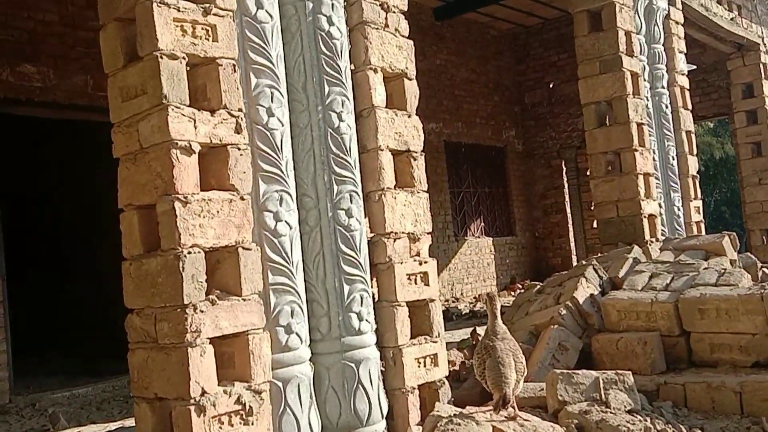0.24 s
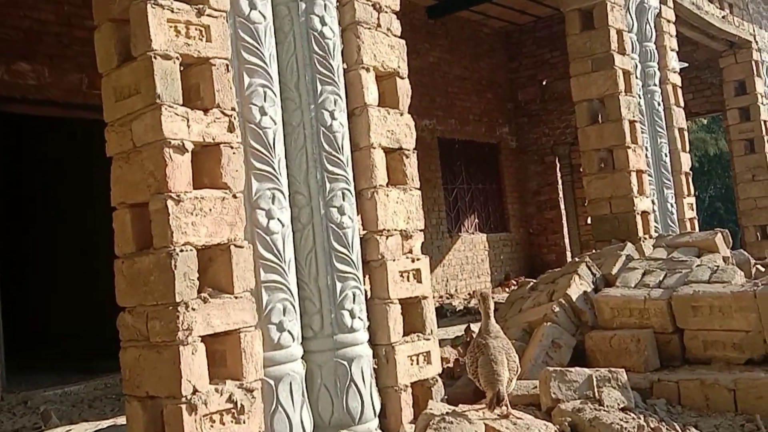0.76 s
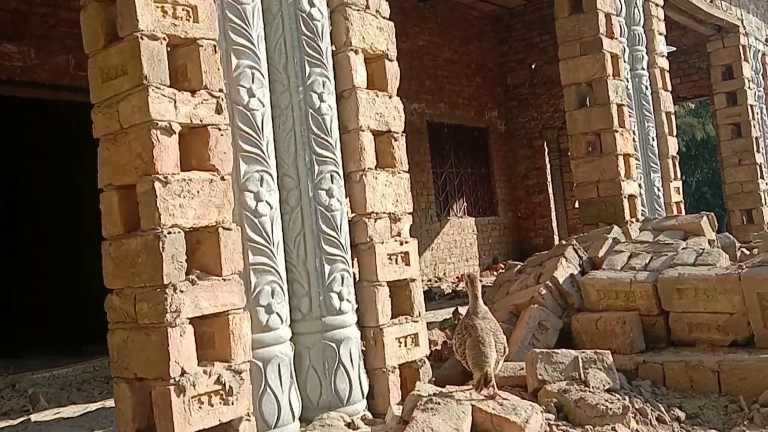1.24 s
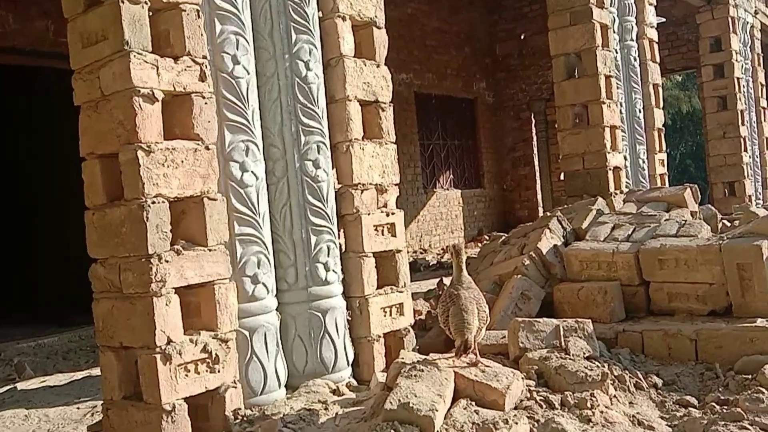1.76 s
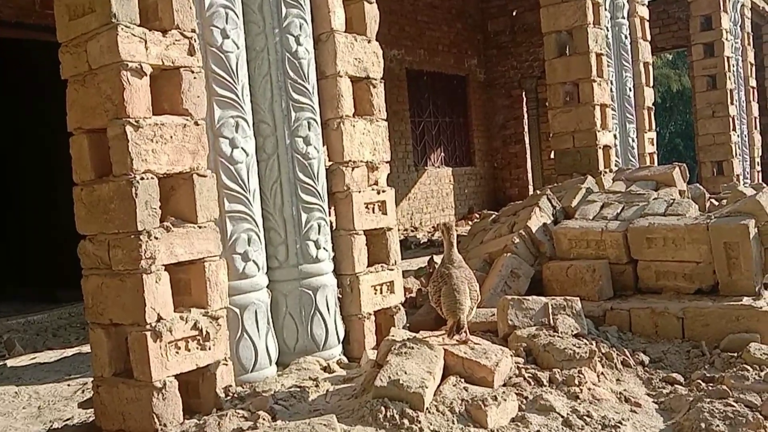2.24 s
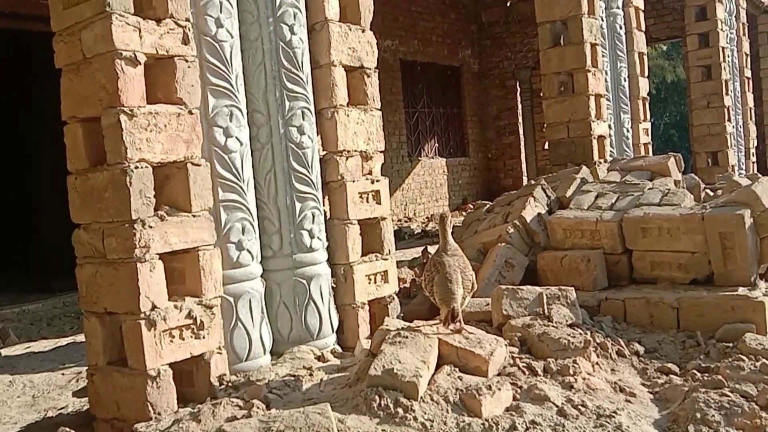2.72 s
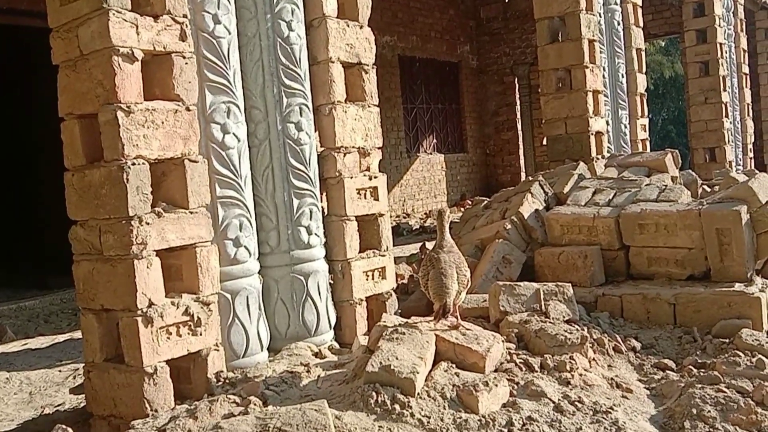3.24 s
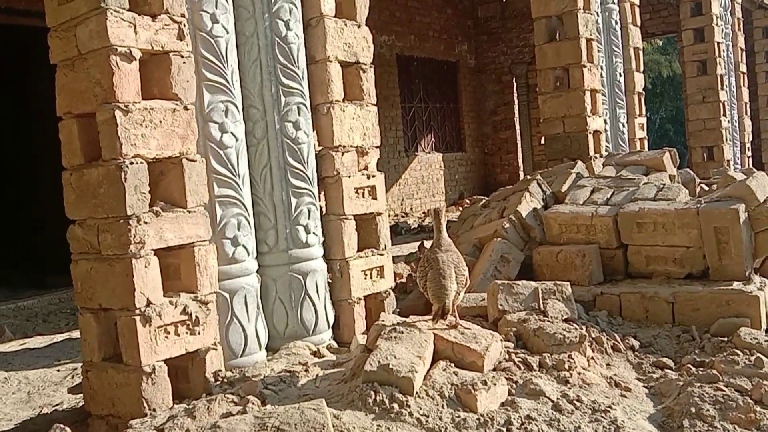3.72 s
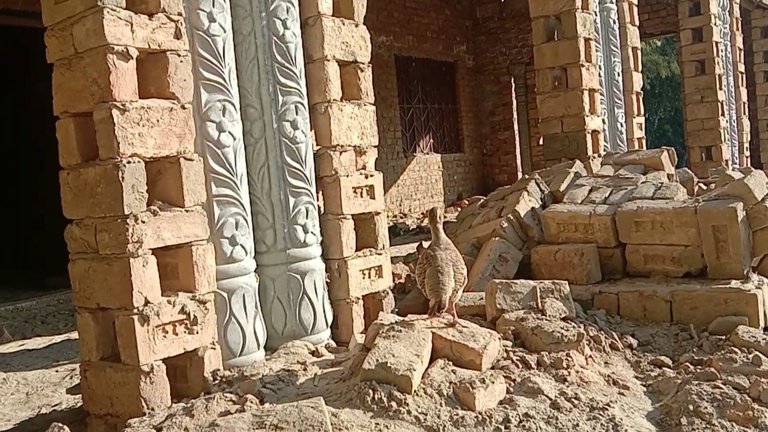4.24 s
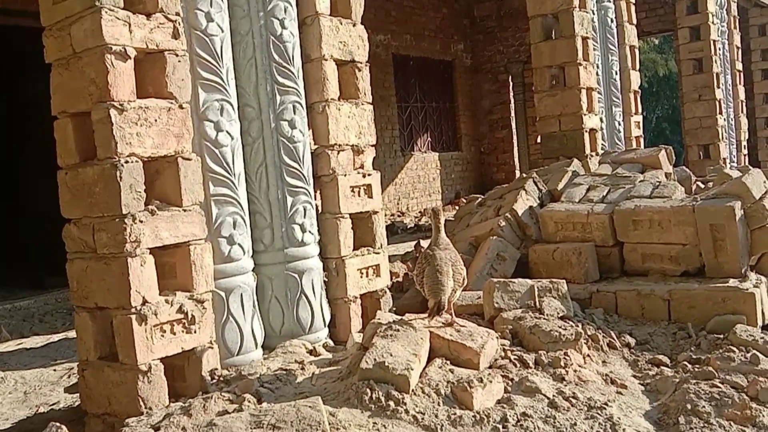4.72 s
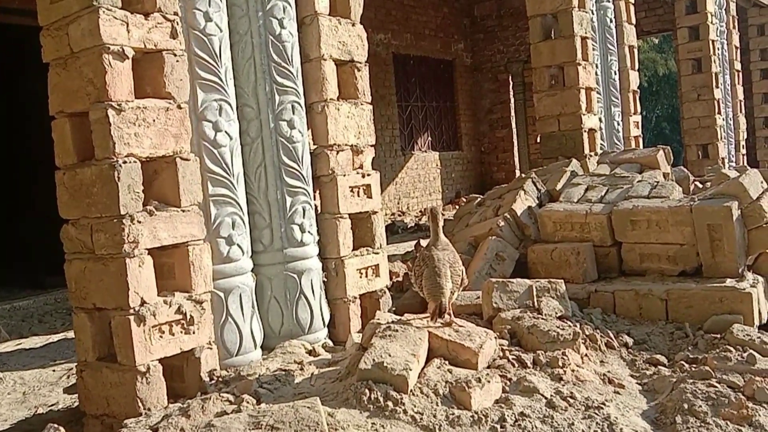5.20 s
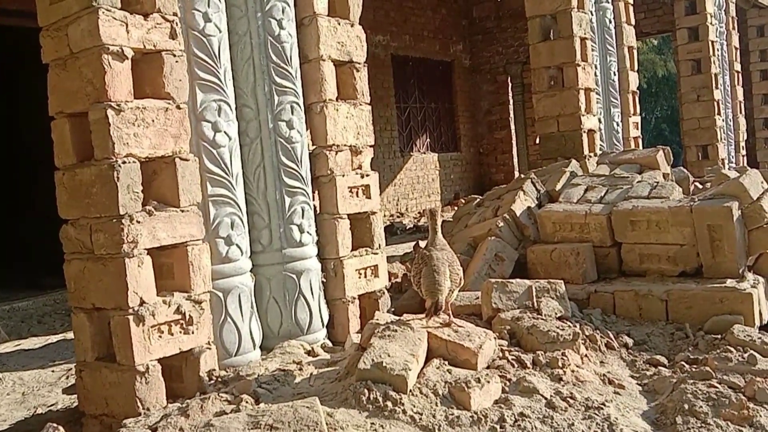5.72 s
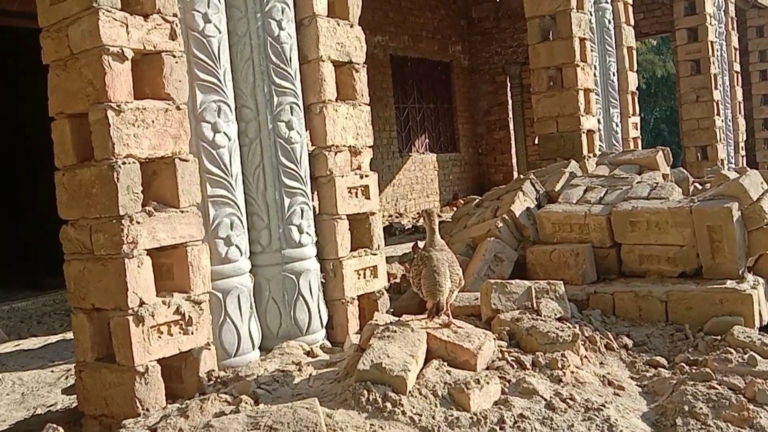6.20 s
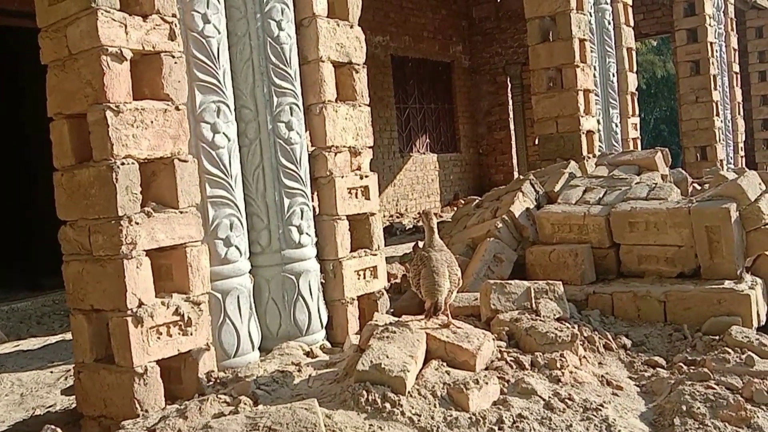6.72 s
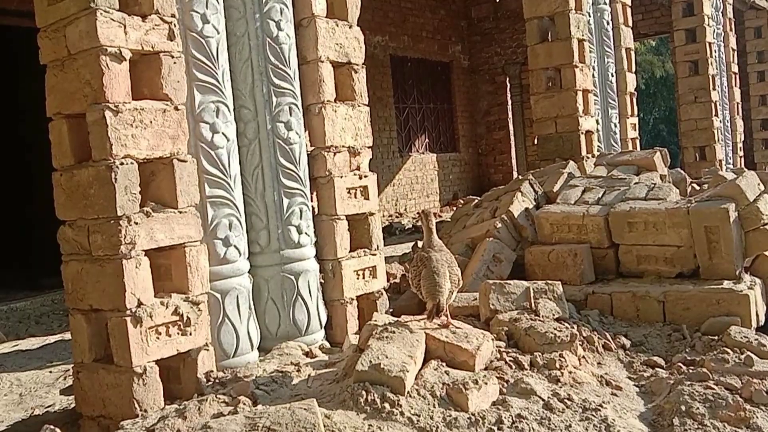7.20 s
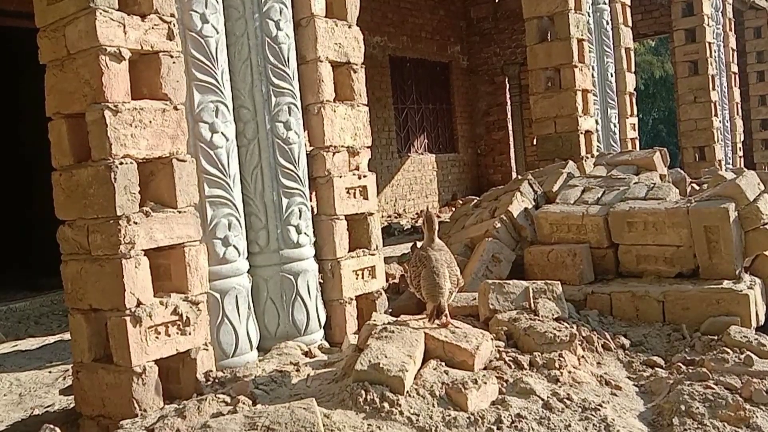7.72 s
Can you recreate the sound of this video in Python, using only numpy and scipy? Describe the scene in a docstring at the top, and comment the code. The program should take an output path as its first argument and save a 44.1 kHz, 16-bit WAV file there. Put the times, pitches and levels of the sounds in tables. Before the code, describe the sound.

Two francolins call in a tight, repeating duet outdoors among brick pillars and rubble. The nearer bird gives a soft throaty gulp, then a loud, nearly pure whistle with a brief arched pitch. Its mate adds hoarse clucks in twos and threes and a raspy screech just after. Brickwork returns short echoes; a low rumble and faint hum sit underneath.

```python
"""Francolin duet in a brick yard

The near bird gulps (two thumps, hoarse noise) and whistles an arched, nearly pure tone.
Its mate screeches (pulsed rasps, clear note, rasps, falling slur) and gives hoarse, ringing clucks.
Veranda brickwork echoes the mate and the yard scatters the whistle, over a rumble and faint hum.
"""
import sys
import numpy as np
from scipy import signal
from scipy.fft import rfft, irfft
from scipy.io import wavfile
from scipy.ndimage import uniform_filter1d, minimum_filter1d

SR = 44100
rng = np.random.default_rng(int(sys.argv[2]) if len(sys.argv) > 2 else 0)


def dump_mix(stems):
    """Bounce the given channels to the path in sys.argv[1] as a 16-bit WAV at rate SR."""
    frames = np.atleast_2d(stems).T  # one column per channel
    limited = np.clip(frames, -1, 1)  # hard clip at full scale
    pcm = np.round(limited * 32767).astype(np.int16)
    wavfile.write(sys.argv[1], SR, pcm)


N = 350595
TIME = np.arange(N) / SR

# Reflection spectrum of the brickwork. Each row: frequency in Hz, gain in dB.
WALL_SPECTRUM = [(200, -12.5), (800, -5), (1400, -9), (2000, 3.5), (2600, -12), (3500, -10), (4500, -12.5),
                 (5300, -13), (6100, 0), (7000, -9.5), (9000, -23), (14000, -32)]


def undb(db):
    """Decibels to amplitude gain."""
    return 10 ** (np.asarray(db) / 20)


def unit(x):
    """Scale to rms 1."""
    return x / np.sqrt(np.mean(x ** 2))


def add(out, start_s, x):
    """Mix x into out from start_s, cropped to fit."""
    i = int(round(start_s * SR))
    x, i = x[max(-i, 0):], max(i, 0)
    out[i:i + len(x)] += x[:max(len(out) - i, 0)]


def colour(x, points, size=2048):
    """Minimum-phase filter through (Hz, dB) points, made by folding the cepstrum."""
    point_hz, point_db = np.transpose(points)
    hz = np.maximum(np.arange(size // 2 + 1) * SR / size, 1)
    gain_db = np.interp(np.log(hz), np.log(point_hz), point_db)
    cepstrum = irfft(np.log(undb(gain_db)))
    cepstrum[1:size // 2] *= 2
    cepstrum[size // 2 + 1:] = 0
    response = irfft(np.exp(rfft(cepstrum)))
    return signal.fftconvolve(x, response)[:len(x)]


def wander(t, rate_hz):
    """Low-passed noise of rms 1 that changes about rate_hz times a second."""
    spectrum = rfft(rng.standard_normal(len(t)))
    hz = np.arange(len(spectrum)) * SR / len(t)
    return unit(irfft(spectrum / (1 + (hz / rate_hz) ** 4), len(t)))


def swell(t, rise_s, fall_s):
    """Gaussian-sided envelope that peaks at t = 0."""
    return np.exp(-(t / np.where(t < 0, rise_s, fall_s)) ** 2)


def burst(t, rise_s, fall_s):
    """A swell with a steeper, fourth-power start."""
    onset = np.exp(-(np.minimum(t, 0) / rise_s) ** 4)
    return swell(np.maximum(t, 0), 1, fall_s) * onset


def held(t, length_s, attack_s, release_s):
    """Envelope eased in from t = 0, held, and eased out by length_s."""
    ramp = np.minimum(t / attack_s, (length_s - t) / release_s)
    return np.sin(np.pi / 2 * np.clip(ramp, 0, 1)) ** 2


def tone(hz, overtones, lift_db=0):
    """Clean membrane vibration: fundamental of rms 1 plus (multiple, dB) overtones, lifted by lift_db."""
    phase = 2 * np.pi * np.cumsum(hz) / SR
    upper = sum(undb(db) * np.sin(round(k) * phase) for k, db in overtones)
    return np.sqrt(2) * (np.sin(phase) + undb(lift_db) * upper)


def pulses(hz, scatter, uneven_db, count=400):
    """Irregular membrane slaps: each cycle draws its own length and strength."""
    chance = rng.standard_normal((count, 2))
    out, at = np.zeros(len(hz) + 1), 0.
    for stretch, strength in chance:
        i = int(at)
        if i >= len(hz):
            break
        # split between two samples for a fractional position
        out[i:i + 2] += undb(uneven_db * strength) * np.array([1 - (at - i), at - i])
        at += SR / hz[i] * np.exp(scatter[i] * stretch)
    return unit(out[:-1])


def background():
    """Outdoor rumble as filtered noise, and a faint hum of wavering pitch and level."""
    # Rumble spectrum. Each row: frequency in Hz, relative level in dB.
    rumble_spectrum = [(20, -27), (45, -12.5), (70, 1.5), (130, -1), (170, 5.5), (220, -11), (330, -18),
                       (900, -25), (2000, -23), (4000, -37), (8000, -55), (14000, -52)]
    rumble_db = -63.5 + 1.9 * wander(TIME, 2.5)
    rumble = undb(rumble_db) * unit(colour(rng.standard_normal(N), rumble_spectrum))
    hum_hz = 178 * (1 + .02 * wander(TIME, 8.8))
    hum_db = -70 + 2.5 * wander(TIME, 8.1)
    return rumble + undb(hum_db) * tone(hum_hz, [(2, -28.0)])


def tail(t60_s):
    """Diffuse brickwork reflections: decaying coloured noise of unit energy."""
    t = np.arange(int(.9 * SR)) / SR
    build_up = 1 - np.exp(-t / 0.036)
    decay = np.exp(-np.log(1000) * t / t60_s)
    response = colour(rng.standard_normal(len(t)), WALL_SPECTRUM) * build_up * decay
    return response / np.sqrt(np.sum(response ** 2))


def veranda(x, room_db=-16, t60_s=0.21):
    """Distinct ground and wall echoes plus a short diffuse tail."""
    # Reflections of the mate. Each row: delay in seconds, gain in dB ahead of the wall spectrum.
    echoes = [(.00205, -22.5), (.0074, -10), (0.0178, -19.5), (.0545, -25.5), (0.067, -39), (0.082, -36)]
    response = np.zeros(int(.9 * SR))
    for delay_s, db in echoes:
        add(response, delay_s, undb([db]))
    response = colour(response, WALL_SPECTRUM)
    add(response, 0, undb(room_db) * tail(t60_s))
    return signal.fftconvolve(x, response)[:N]


def yard(x):
    """Rubble close by scatters the sound briefly; far walls let it linger."""
    response = undb(-31.5) * tail(t60_s=0.085) + undb(-45.5) * tail(t60_s=1.8)
    return signal.fftconvolve(x, response)[:N]


def cluck(hz, ring_db, rasp_db, push, rate_hz=470, scatter=0.16, rattle_hz=140):
    """Hoarse slaps that sink into the throat's lowest resonance, a tone of falling pitch."""
    # Throat response to the slaps. Each row: frequency in Hz, relative gain in dB.
    throat = [(430, -38.5), (530, -19.5), (680, -22.5), (950, -3), (1500, 3.5), (2450, -5), (3100, 6),
              (3650, -5), (4000, -10), (4900, 1.5), (5500, -2.5), (6600, -21.5), (7600, -38), (9600, -37),
              (12000, -62)]
    fall_per_s, wobble = 4.45, .09  # log pitch at full push
    t = np.arange(int(.08 * SR)) / SR - .035
    slaps = pulses(np.full(len(t), rate_hz), np.full(len(t), scatter), uneven_db=-0.5)
    slaps = slaps + .35 * rng.standard_normal(len(t))
    hoarse = undb(rasp_db) * burst(t + 0.0035, 0.017, 0.014) * unit(colour(slaps, throat))
    ring_hz = hz * np.exp(push * (wobble * wander(t, 380) - fall_per_s * t))
    ring = tone(ring_hz, [(2, -31)]) * undb(1.6 * wander(t, 180))
    ring = undb(ring_db) * swell(t - .003, 0.018, 0.016) * ring
    # fluttering airflow gives a coarse grain
    flutter = 1 + .2 * tone(rattle_hz * np.exp(.3 * wander(t, 100)), [])
    return flutter * (hoarse + ring)


def clucks():
    """Within a run the bird loses push: each cluck is lower, steadier and less raspy."""
    # Clucks in runs of two or three. Each row: time in seconds, base level in dB for ring and rasp.
    cluck_rows = [(0.019, -15.5), (0.122, -16.5), (0.246, -18.5), (0.671, -16), (0.779, -15), (0.91, -25),
                  (1.369, -16), (1.473, -18.5), (1.594, -24), (2.091, -16), (2.193, -15.5), (2.31, -21.5),
                  (2.881, -15.5), (2.986, -21), (3.102, -25.5), (3.752, -16), (3.852, -20), (3.961, -28.5),
                  (4.572, -18), (4.673, -23), (4.784, -35), (5.376, -20.5), (5.483, -23.5), (5.596, -45),
                  (6.227, -20.5), (6.327, -25.5), (7.114, -21.5), (7.215, -28.5)]
    run_gap_s = .2
    first_hz, sag_share, push_ratio = 1472, .035, 0.79  # sag and ratio per place in the run
    out, place, previous_s = np.zeros(N), 0, -np.inf
    for s, db in cluck_rows:
        place = place + 1 if s - previous_s < run_gap_s else 0
        hz = first_hz * (1 - sag_share * place)
        call = cluck(hz, ring_db=db - 1, rasp_db=db - 5 - 3 * place, push=push_ratio ** place)
        add(out, s - .035, call)
        previous_s = s
    return out


def rasp(t, rise_s, fall_s, rate_hz, scatter, db):
    """Chaotic slapping near half pitch, loudest at t = 0, its rate sinking throughout."""
    # Throat response to the rasp. Each row: frequency in Hz, relative gain in dB.
    throat = [(550, -55), (950, -21), (1400, -12), (2200, -16), (2750, -2.5), (3350, 0.5), (3950, -12),
              (4600, -8.5), (5600, -2.5), (6400, -21), (7200, -24), (9500, -39), (15000, -48.5)]
    sag_per_s = 6  # log rate
    hz = rate_hz * np.exp(-sag_per_s * np.clip(t, -rise_s, fall_s))
    slaps = pulses(hz, np.full(len(t), scatter), uneven_db=3.5)
    # more irregular slaps carry more turbulent air
    slaps = slaps + 5 * scatter * rng.standard_normal(len(t))
    return undb(db) * swell(t, rise_s, fall_s) * unit(colour(slaps, throat))


def clear_note(t, hz):
    """The membrane locks into a sagging tone; overtones start at once, the fundamental swells in."""
    # Overtones. Each row: multiple of the fundamental, level in dB ahead of the lift.
    overtones = [(2, -5), (3, -11.5), (4, -24.5), (5, -30), (6, -34), (7, -32)]
    length_s, level_db, sag_share = .045, -19, 0.0076
    lift_db, edge_start_db, settle_s = 4, 11, 0.0075
    edge_db = edge_start_db * np.exp(-np.maximum(t, 0) / settle_s)
    sag = 1.003 - sag_share * np.clip(t / length_s, 0, 1) ** 3
    hz = hz * sag * (1 + 0.0084 * wander(t, 500))
    gate = held(t, length_s, attack_s=.005, release_s=0.0021)
    # the edge lowers the fundamental and leaves the overtones
    return gate * undb(level_db - edge_db) * tone(hz, overtones, lift_db + edge_db)


def slur(t, hz, crest_s=0.031):
    """The membrane slackens: the tone falls, dulls and turns rough."""
    # Overtones. Each row: multiple of the fundamental, level in dB ahead of lift and dulling.
    overtones = [(2, -5.5), (3, 0), (4, -23), (5, -35.5), (6, -43), (7, -40)]
    length_s, level_db, lift_db, dull_db = .058, -23, 11, -30.5
    hold_s, fall_s, drop_share = .006, .026, .27
    slack = 1 - swell(np.maximum(t - hold_s, 0), 1, fall_s)
    roughness = (0.0067 + 0.031 * slack) * wander(t, 320)
    hz = hz * (1 - drop_share * slack) * (1 + roughness)
    shake_db = 2.5 * wander(t, 250)
    gate = held(t, length_s, attack_s=0.014, release_s=0.015) * swell(t - crest_s, 0.023, 0.021)
    return gate * undb(level_db + shake_db) * tone(hz, overtones, lift_db + dull_db * slack)


def screech(db, note_hz, slur_hz):
    """The syrinx jumps between chaotic slapping near half pitch and clean vibration."""
    # Two rasps before the note, two after, one under the slur. Each row: peak time in seconds,
    # rise in seconds, fall in seconds, pulse rate at the peak in Hz, period scatter (log),
    # level in dB relative to the screech.
    rasp_rows = [(.009, .007, 0.02, 1091, 0.034, -17), (.031, .006, .005, 1039, .14, -14.5),
                 (.076, .004, 0.0082, 948, .09, -15.5), (.094, .005, .005, 960, .14, -19),
                 (0.134, 0.016, 0.031, 856, .2, -30)]
    note_at_s, slur_at_s = .028, .094
    t = np.arange(int(.18 * SR)) / SR - .005
    gate = held(t - t[0], t[-1] - t[0], attack_s=0.0046, release_s=.006)
    rasps = gate * sum(rasp(t - s, *shape) for s, *shape in rasp_rows)
    voiced = clear_note(t - note_at_s, note_hz) + slur(t - slur_at_s, slur_hz)
    return undb(db) * (rasps + voiced)


def screeches():
    """All the mate's screeches, each with its own level and pitches."""
    # Each row: start in seconds, gain in dB, nominal clear note in Hz, nominal slur start in Hz.
    screech_rows = [(0.38, 1.5, 2120, 2070), (1.084, 3.5, 2105, 2081), (1.806, -2, 2127, 2077),
                    (2.591, -1, 2103, 2066), (3.463, -1.5, 2116, 2086), (4.285, -1.5, 2112, 2068),
                    (5.093, 0.5, 2114, 2062), (5.947, -3.5, 2112, 2027), (6.828, -2, 2114, 2012),
                    (7.711, 2.5, 2108, 1897)]
    out = np.zeros(N)
    for s, *shape in screech_rows:
        add(out, s - .005, screech(*shape))
    return out


def gulp(low_db, upper_db, low_hz=235, upper_hz=520):
    """The throat opens: a low and an upper thump of wavering pitch, with a hoarse noise onset."""
    # Hoarse onset spectrum. Each row: frequency in Hz, relative level in dB.
    hoarse_spectrum = [(800, -30.5), (1250, -15.5), (1550, 4.5), (2100, -6), (3000, -12.5), (4000, -35.5),
                       (5200, -7.5), (6200, -20), (8000, -37.5), (14000, -57.5)]
    t = np.arange(int(.09 * SR)) / SR - .04
    low_hz = low_hz * np.exp(-4 * t + 0.12 * wander(t, 100))
    low = undb(low_db) * burst(t - .003, 0.017, 0.0022) * tone(low_hz, [(2, -22)])
    upper_hz = upper_hz * np.exp(0.13 * wander(t, 80))
    upper = undb(upper_db) * swell(t + 0.0037, 0.0089, 0.011) * tone(upper_hz, [(2, -31.5)])
    hoarse = unit(colour(rng.standard_normal(len(t)), hoarse_spectrum))
    hoarse = undb(-32.5) * burst(t - .004, 0.014, 0.047) * hoarse
    return undb(-2.5) * (low + upper) + hoarse


def gulps():
    """All gulps of the near bird, just ahead of its whistles."""
    # Each row: time in seconds, low and upper thump in dB ahead of a common 2.5 dB cut.
    gulp_rows = [(0.306, -41.5, -37.5), (1.664, -38.5, -28), (2.497, -35, -52.5), (3.339, -41.5, -37),
                 (4.137, -37, -45.5), (4.940, -38, -57.5), (5.795, -37.5, -37), (6.656, -41, -43),
                 (7.519, -50, -54)]
    out = np.zeros(N)
    for s, *shape in gulp_rows:
        add(out, s - .04, gulp(*shape))
    return out


def whistle(length_s, top_hz, end_hz, hold_s, attack_s=0.0071, release_s=.004, arch=2.1, air_db=-38):
    """A nearly pure arch of pitch with a little rush of air around it."""
    # Overtones. Each row: multiple of the fundamental, level in dB.
    overtones = [(2, -41.5), (3, -36.5), (4, -59.5)]
    # Air rush spectrum. Each row: frequency in Hz, relative level in dB.
    air_spectrum = [(500, -38), (780, -28), (1080, -2.5), (2000, -10), (2800, 1.5), (4050, -14),
                    (5400, 0.5), (6100, -4.5), (6600, -7), (7600, -20.5), (9500, -26.5), (12700, -31),
                    (14800, -21.5)]
    start_hz, level_db, end_fade_db = 1993, -5.4, -23
    t = np.arange(int(.22 * SR)) / SR
    crest_s = .021 + .4 * hold_s  # a longer push crests later
    rising = np.maximum(1 - t / crest_s, 0) ** 2
    falling = np.clip((t - crest_s) / (length_s - crest_s), 0, 1.2) ** arch
    hz = top_hz + (start_hz - top_hz) * rising + (end_hz - top_hz) * falling
    hz = hz * (1 + .0012 * wander(t, 200))
    tremor_db = .3 * wander(t, 90)
    # the push gives way slowly, then quickly
    fade_db = end_fade_db * np.clip((t - hold_s) / (length_s - hold_s), 0, 1.2) ** 2
    onset = 1 - np.exp(-t / attack_s)
    after_s = np.maximum(t - length_s, 0)
    gate = onset ** 2 * swell(after_s, 1, release_s)
    flow = onset * swell(after_s, 1, .03)  # air outlasts the tone
    air = unit(colour(rng.standard_normal(len(t)), air_spectrum))
    air = flow * undb(air_db + 0.17 * fade_db) * air
    return gate * undb(level_db + fade_db + tremor_db) * tone(hz, overtones) + air


def whistles():
    """All whistles of the near bird, each with its own arch."""
    # Each row: start in seconds, length in seconds, top in Hz, end in Hz, full push held in seconds.
    whistle_rows = [(0.328, 0.14, 2084, 1593, 0.022), (1.684, 0.14, 2143, 1896, 0.062),
                    (2.513, 0.13, 2105, 1800, 0.057), (3.352, 0.13, 2130, 1834, 0.058),
                    (4.154, 0.12, 2125, 1896, 0.041), (4.955, 0.13, 2146, 1892, 0.058),
                    (5.811, 0.13, 2174, 1830, 0.083), (6.667, 0.13, 2210, 1865, 0.094),
                    (7.539, 0.14, 2198, 1854, 0.082)]
    out = np.zeros(N)
    for s, *shape in whistle_rows:
        add(out, s, whistle(*shape))
    return out


def scene():
    """Background, mate with veranda echoes, near bird with yard reflections."""
    mate = clucks() + screeches()
    near = gulps() + whistles()
    mix = near + yard(near) + mate + veranda(mate) + background()
    fade_in = np.minimum(TIME / .004, 1)
    return (fade_in * mix)[None]


def follow(x, release_db_per_s):
    """Level in dB over 10 ms windows: rises at once, falls no faster than the release."""
    db = 10 * np.log10(np.abs(uniform_filter1d(x ** 2, size=441)) + 1e-12)
    return np.maximum.accumulate(db + release_db_per_s * TIME, axis=-1) - release_db_per_s * TIME


def record(dry):
    """A phone's chain: ducks bass under loud calls, hushes pauses, limits peaks, cuts the top."""
    bass_hz, duck_above_db, duck_slope, duck_release_db_per_s = 373, -16, 2.8, 34.5
    hush_below_db, hush_slope, hush_depth_db, hush_release_db_per_s = -34, 1, 6.5, 131
    top_hz = 15750
    bass = signal.sosfiltfilt(signal.butter(4, bass_hz, fs=SR, output="sos"), dry)
    duck_db = -duck_slope * np.maximum(follow(dry, duck_release_db_per_s) - duck_above_db, 0)
    under_db = follow(dry, hush_release_db_per_s) - hush_below_db
    hush_db = np.clip(hush_slope * under_db, -hush_depth_db, 0)
    x = (dry - bass + undb(duck_db) * bass) * undb(hush_db)
    needed_gain = np.minimum(.92 / (np.abs(x) + 1e-9), 1)
    limiter_gain = uniform_filter1d(minimum_filter1d(needed_gain, size=221), size=221)
    low_pass = signal.ellip(10, .1, 80, top_hz, fs=SR, output="sos")
    return signal.sosfilt(low_pass, x * limiter_gain)


dry = scene()
out = record(dry)
dump_mix(out)
```